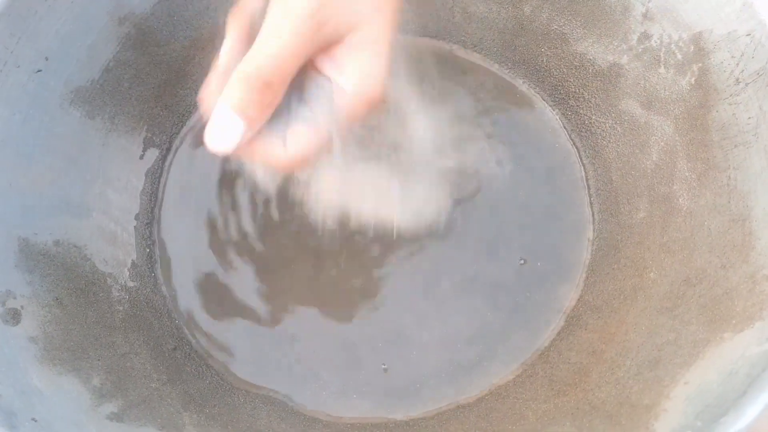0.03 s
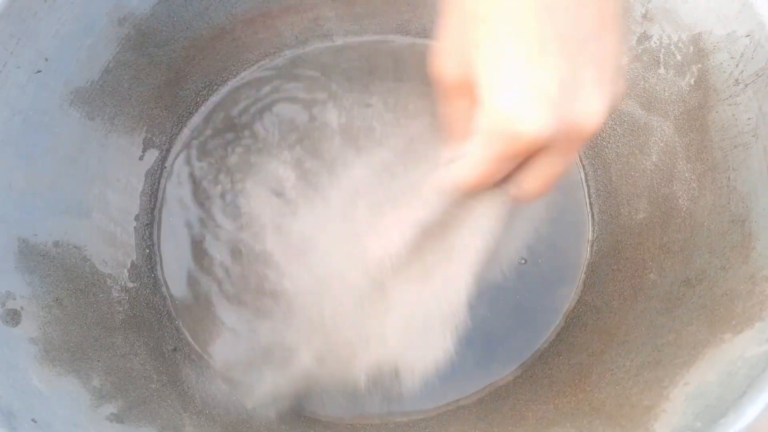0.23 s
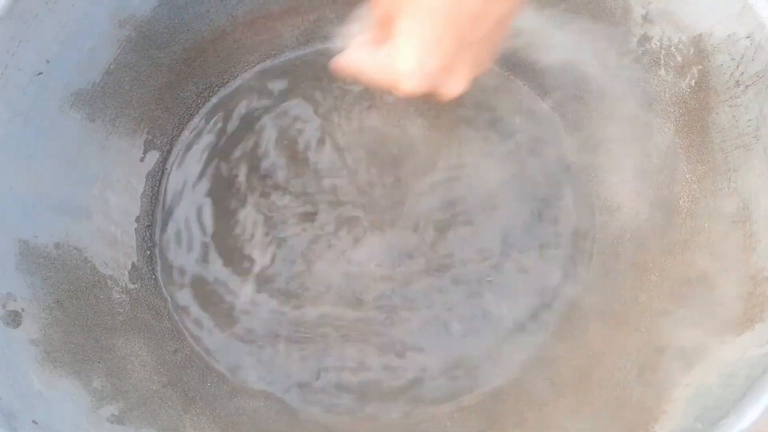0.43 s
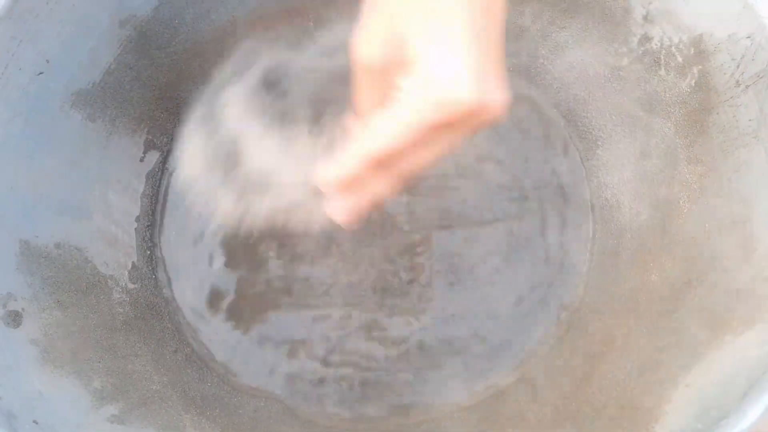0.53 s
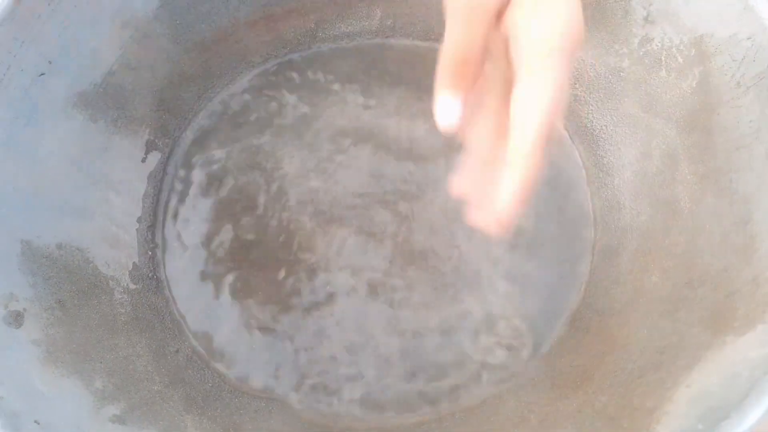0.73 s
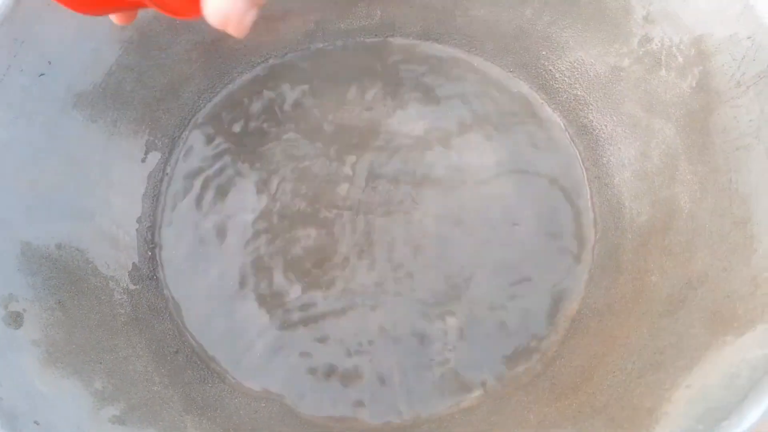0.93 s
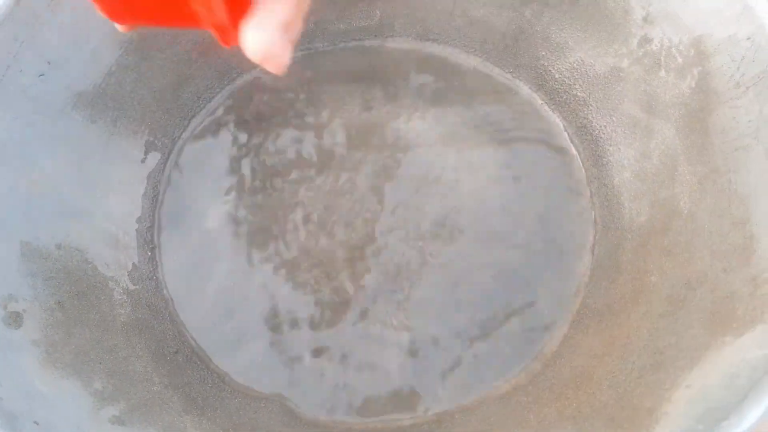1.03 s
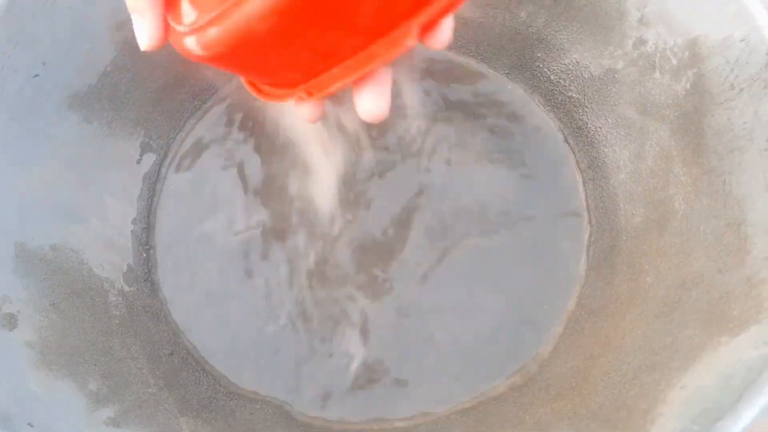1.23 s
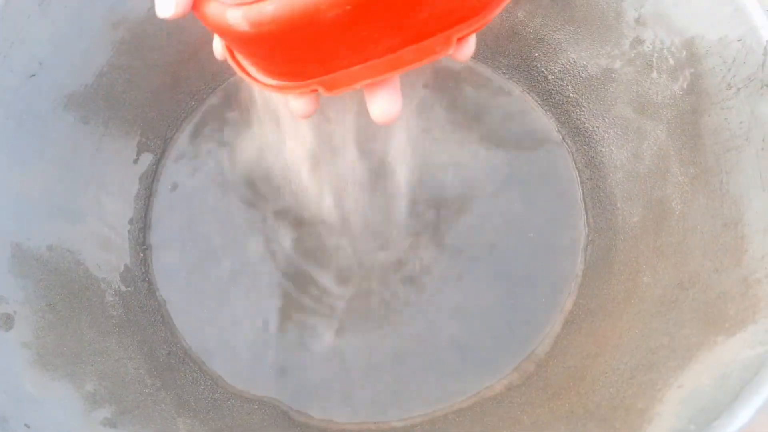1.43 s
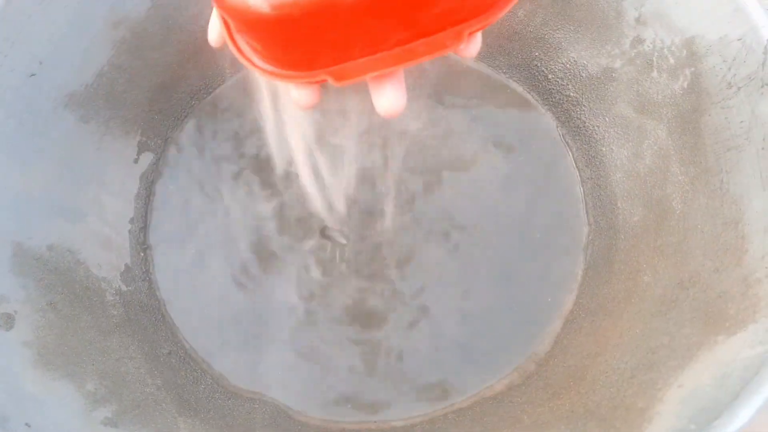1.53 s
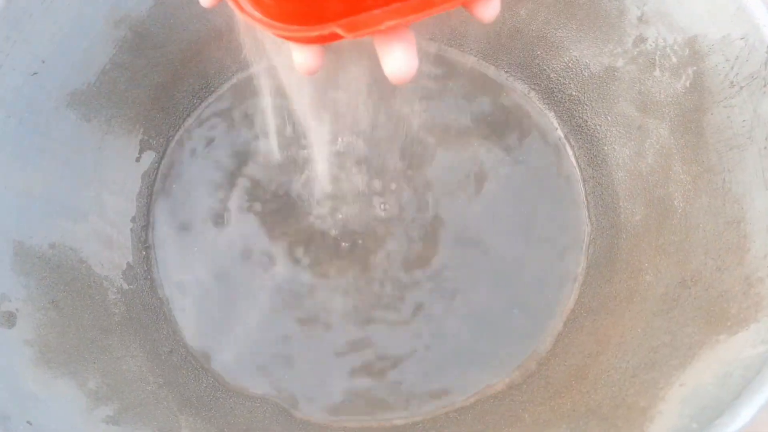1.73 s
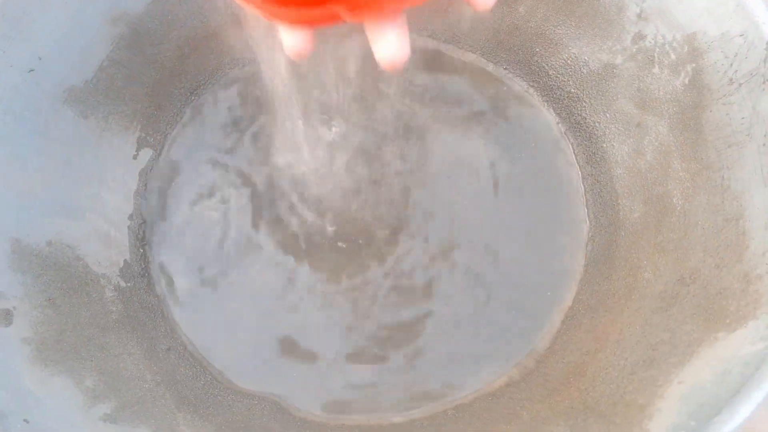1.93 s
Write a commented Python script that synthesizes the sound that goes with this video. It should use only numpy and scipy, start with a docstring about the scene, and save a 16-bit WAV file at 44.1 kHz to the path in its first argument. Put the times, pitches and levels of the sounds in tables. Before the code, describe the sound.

Sand lands in a basin of water, hissing with ticks and ringing drips for the first 0.8 seconds. From 0.2 to 0.5 seconds a loud, bassy puff of air buffets the microphone on the left. After a lull, poured sand crackles, plops and gurgles hollowly from 1.3 to 1.6 seconds, then thin streams patter until 2 seconds. A low outdoor rumble lies behind, with faint hooting early on.

```python
"""Sand is flung into a wide basin with a pool in its bottom; the throw blows air across the left
microphone port. Fine grains hiss on the water, lumps tick as they hit, and drips ring with clear notes.
After a lull, sand is poured: a dense run of cracks and bubbles that ring in the hollow, gurgling basin.
The last thin streams drum on the pool.
Behind it all lies a low outdoor rumble, with a faint hooting tone early on."""
import sys
import numpy as np
from scipy import signal
from scipy.fft import rfft, irfft, next_fast_len
from scipy.io import wavfile
from scipy.ndimage import uniform_filter1d, map_coordinates

SR = 44100
rng = np.random.default_rng(int(sys.argv[2]) if len(sys.argv) > 2 else 0)


def wav_record(signal):
    """Record a signal, one row per channel, as 16-bit PCM in the file named by sys.argv[1]."""
    frames = np.transpose(np.atleast_2d(signal))
    bounded = np.clip(frames, -1, 1)
    # unit amplitude maps onto the largest positive 16-bit level
    quanta = np.round(bounded * 32767).astype(np.int16)
    wavfile.write(sys.argv[1], SR, quanta)


N = 88200

# flow of falling sand (time [s], level [dB])
SAND_FLOW = [(0, -54), (0.025, -66.5), (0.08, -49), (0.11, -65.5), (0.21, -68), (0.245, -45.5), (0.3, -52),
             (0.4, -43), (0.465, -51.5), (0.5, -44), (0.55, -52), (0.65, -58.5), (0.7, -54), (0.8, -61),
             (0.915, -72), (0.935, -56.5), (1.02, -55.5), (1.05, -50), (1.105, -46.5), (1.125, -53),
             (1.31, -54.5), (1.38, -41), (1.46, -41.5), (1.53, -50.5), (1.66, -54.5), (1.89, -56.5),
             (1.975, -48), (2, -60)]
# tone of grains on water (frequency [Hz], gain [dB])
GRAIN_COLOUR = [(700, -8.5), (1700, -10), (3000, 2), (4500, 4), (6500, 1), (8300, 1.5), (9400, -12),
                (12500, -7.5), (16000, -5.5)]
TOP_HZ, CRACK_T60_S = 16000, .0042
NOTE_HOLD_S, TICK_HOLD_S = .02, .003  # a hit carries the energy of its level held this long
LEFT_RIGHT = np.array([[.5], [-.5]])  # splits a difference between the channels


def sand():
    """Fine grains fizz on the surface, coarser ones standing out, over the churn of stirred water."""
    # lean of the fizz (frequency [Hz], left over right [dB])
    balance = [(1000, 2), (5000, -0.5), (8500, -4), (10000, 11), (15000, 4)]
    # swell of the stirred water (time [s], level [dB])
    stirring = [(0, -57), (0.13, -62), (0.25, -47), (0.43, -48.5), (0.52, -57.5), (0.62, -68), (0.73, -63),
                (0.85, -59.5), (1.31, -54.5), (1.38, -77), (1.5, -50), (1.63, -54.5), (1.75, -60.5)]
    # tone of the stirred water (frequency [Hz], gain [dB])
    churn_colour = [(200, -49), (500, -2), (1000, 2), (1600, 7), (2300, 2.5), (3500, -6)]
    grains_per_s, spread_db = 2700, 3
    sizes = amp(spread_db * np.minimum(rng.exponential(size=N), 5))
    grains = (rng.random(N) < grains_per_s / SR) * sizes * rng.standard_normal((2, N))
    grains = causal(stereo(grains), lambda hz: amp(along(GRAIN_COLOUR, hz)))
    fizz = unit(noise(GRAIN_COLOUR) + amp(-2.5) * unit(grains))
    churn = amp(curve(stirring) - 3 + 3 * wobble(40.26)) * noise(churn_colour)
    return amp(curve(SAND_FLOW) - 1 + 2.08 * wobble(56.76)) * panned(fizz, balance) + churn


def specks(per_s=35):
    """Now and then one coarser grain ticks out of the hiss."""
    hits = (rng.random(N) < per_s / SR) * amp(3 * rng.standard_normal(N))
    t = np.arange(2 ** 8) / SR
    tick = burst(stereo(rng.standard_normal((2, len(t)))) * decay(t, CRACK_T60_S), TICK_HOLD_S)
    train = signal.fftconvolve(hits[None], tick, axes=1)[:, :N]
    return amp(curve(SAND_FLOW) - 4) * causal(train, lambda hz: amp(along(GRAIN_COLOUR, hz)))


def lumps(ring_cycles=41):
    """Each lump cracks the surface, throws spray and rings one small bubble in the basin."""
    # lumps landing (time [s], bubble level [dB], bubble pitch [Hz], crack level [dB], right lag [s])
    landings = [(0.0369, -48, 7600, -35, 0.000124), (0.071, -36.5, 5320, -45, 0.00021),
                (0.1548, -50, 6440, -32, 0.00011), (0.312, -47, 10900, -36.5, 0.00017),
                (0.329, -40, 4820, -40, 0.00023), (0.403, -37, 5000, -29.5, 0.00013),
                (0.4879, -38.5, 5340, -41, 0.00023), (0.509, -38, 3930, -50, 0.00019),
                (0.7461, -36, 4000, -33, 0.0001), (0.7583, -44, 3700, -32.5, 0.00018),
                (1.328, -33, 3540, -38, 0.00018), (1.358, -25, 3290, -34.5, .0001),
                (1.3723, -28, 7700, -26.5, 0.000098), (1.4054, -36.5, 10440, -22, .00012),
                (1.4245, -32, 8400, -24, 0.000086), (1.453, -32, 5950, -43, 0.00024),
                (1.467, -38, 11000, -29, .00016), (1.487, -35.5, 4140, -53, 0.000053),
                (1.513, -35, 3300, -37, 0.000091), (1.5489, -25, 5320, -23, 0.00014),
                (1.5552, -26, 4780, -18.5, 0.00019), (1.594, -43, 5960, -33.5, 0.00015),
                (1.726, -61, 6160, -43.5, 0.00013), (1.770, -49.5, 6500, -53, 0.00011)]
    # tone of the crack (frequency [Hz], gain [dB])
    crack_colour = [(1000, -15), (3000, -3.5), (7500, 0), (9500, -11.5), (12500, -1.5), (16000, -6)]
    out, t = np.zeros((2, N)), np.arange(2 ** 12) / SR
    spray = amp(-9) * decay(t, t60=.025)
    snap = (decay(t, CRACK_T60_S) + spray) * attack(t, .0004)
    for s, db, hz, crack_db, lag in landings:
        bubble = np.sin(2 * np.pi * hz * t) * decay(t, ring_cycles / hz) * attack(t, .000067)
        ring = signal.fftconvolve(basin()[:, :len(t)], bubble[None], axes=1)[:, :len(t)]
        crack = stereo(rng.standard_normal((2, len(t)))) * snap
        crack = causal(crack, lambda f: amp(along(crack_colour, f)))
        tone = burst(bubble, TICK_HOLD_S) + amp(-10) * burst(ring, TICK_HOLD_S)
        hit = amp(db - .5) * tone + amp(crack_db - 4.5) * burst(crack, TICK_HOLD_S)
        add(out, s, lagged(hit, lag))
    return out


def plops():
    """A cavity closes behind a lump with a short note and sets the basin ringing around that pitch."""
    # closing cavities (time [s], level [dB], pitch [Hz], ring width [octaves])
    cavities = [(0.155, -41, 2132, 0.13), (0.155, -43.5, 1360, 0.45), (0.234, -43.5, 2224, 0.29),
                (0.242, -48, 1070, 0.13), (0.309, -36, 1420, 0.17), (0.488, -42.5, 4670, 0.38),
                (0.508, -42.5, 4340, 0.33), (0.745, -49, 3880, 0.45), (0.759, -40.5, 1750, 0.3),
                (1.328, -37, 340, 0.75), (1.327, -40.5, 1710, 0.32), (1.357, -32.5, 2140, 0.57),
                (1.375, -31, 1550, 0.41), (1.406, -33, 1940, 0.2), (1.424, -24, 554, 0.56),
                (1.439, -29, 1360, 0.52), (1.449, -33.5, 603, 0.14), (1.557, -31, 1297, 0.26),
                (1.563, -30.5, 419, 0.27), (1.574, -35, 1027, 0.25)]
    out, t = np.zeros((2, N)), np.arange(2 ** 14) / SR
    for s, db, hz, width in cavities:
        ring = causal(basin(), lambda f: resonance(f, hz, width))
        note = np.sin(2 * np.pi * hz * t) * decay(t, t60=.0094) * attack(t, .00055)
        add(out, s, amp(db) * (burst(ring, NOTE_HOLD_S) + amp(-12.5) * burst(note, NOTE_HOLD_S)))
    return out


def basin():
    """The hollow basin answers one spot of the pool: air modes over a diffuse ring, quickly building."""
    # air modes (pitch [Hz], level [dB], t60 [s])
    air_modes = [(328, 4.5, 0.21), (398, -9, 0.19), (510, -4.5, 0.17), (603, 0, 0.17), (649, -7, 0.2),
                 (732, -11, 0.16), (827, -10, 0.14), (918, -12, 0.18), (1025, -9, 0.18), (1142, -13, 0.18),
                 (1308, -12, 0.13), (1437, -8.5, 0.16), (1518, -10, 0.13), (1896, -11, 0.1)]
    # length of the diffuse ring (frequency [Hz], t60 [s])
    ring_times = [(200, 0.055), (800, 0.31), (2100, 0.15), (3200, 0.15), (5500, 0.029), (14000, 0.063)]
    hz, t, spectrum = signal.stft(stereo(rng.standard_normal((2, 2 ** 14))), SR, nperseg=256)
    tail = signal.istft(spectrum * decay(t, along(ring_times, hz)[:, None]), SR, nperseg=256)[1]
    t = np.arange(tail.shape[1]) / SR
    modes = sum(amp(db + rng.normal()) * decay(t, t60) * np.sin(2 * np.pi * (f * t + rng.random()))
                for f, db, t60 in air_modes)
    return (unit(tail) + amp(1) * unit(modes)) * attack(t, .001)


def showers(count=170, ring_cycles=13, octaves=.55, scatter_db=3.5):
    """Tiny bubbles, each a few cycles long, crackle where the sand breaks the surface."""
    # bubble clouds; short ones are clumps bursting (time [s], spread [s], level [dB], middle pitch [Hz])
    clouds = [(0.41, 0.038, -45.5, 4260), (1.075, 0.022, -53, 5400), (1.381, 0.009, -33, 4400),
              (1.405, .0017, -25, 5400), (1.428, 0.0027, -32, 5100), (1.439, 0.0023, -29.5, 4400),
              (1.455, 0.011, -46.5, 4260), (1.491, 0.0036, -37, 2820)]
    out, t = np.zeros((2, N)), np.arange(2 ** 9) / SR
    for s, spread, db, middle in clouds:
        shower = np.zeros((2, N))
        for when, pitch, size, place in rng.standard_normal((count, 4)):
            hz = min(middle * 2 ** (octaves * pitch), TOP_HZ)
            bubble = np.sin(2 * np.pi * hz * t + place * LEFT_RIGHT) * decay(t, ring_cycles / hz)
            gain = amp(scatter_db * min(size, 2)) * np.sqrt(hz / middle)
            add(shower, s + spread * when, gain * bubble)
        out += amp(db) * burst(shower, 2 * spread)
    return out


def drips(split_hz=50, waver_rad=.65, wavers_per_s=180):
    """A drip traps a bubble whose clear note wavers as the water moves and beats against its echo."""
    # ringing drips (time [s], level [dB], pitch [Hz], t60 [s])
    notes = [(0.038, -46, 2920, .14), (0.155, -40.5, 2135, .18), (0.232, -51, 2230, .08),
             (0.260, -48, 3020, .11), (0.746, -46.5, 3820, .11), (0.760, -46.5, 1785, .36),
             (0.862, -60, 2190, .22)]
    out, t = np.zeros((2, N)), np.arange(N) / SR

    def partial(hz):
        phase = 2 * np.pi * (hz * t + rng.random((2, 1)))
        return np.sin(phase + waver_rad * np.array([wobble(wavers_per_s), wobble(wavers_per_s)]))

    for s, db, hz, t60 in notes:
        note = partial(hz) + amp(-5) * partial(hz - split_hz * rng.uniform(.42, 2.12))
        add(out, s, amp(db) * burst(note * decay(t, t60) * attack(t, .001), NOTE_HOLD_S))
    return out


def gurgles(octaves=.11):
    """Moving water keeps single air modes of the basin sounding."""
    # hollow swells (peak time [s], half-length [s], level [dB], pitch [Hz])
    swells = [(0.027, 0.15, -49.5, 621), (1.22, 0.061, -53.5, 667), (1.406, 0.096, -35, 337),
              (1.492, 0.05, -44, 700), (1.478, 0.15, -42, 66), (1.73, 0.17, -54.5, 478)]
    out = np.zeros((2, N))
    for s, half_length, db, hz in swells:
        hum = filtered(stereo(rng.standard_normal((2, N))), lambda f: resonance(f, hz, octaves))
        out += amp(db) * swell(s, half_length) * unit(hum)
    return out


def dribbles():
    """The last thin streams drum on the pool, each swelling and fading."""
    # streams (peak time [s], half-length [s], level [dB])
    streams = [(1.696, 0.041, -49), (1.834, 0.042, -47.5), (1.974, 0.037, -42)]
    # tone of the drumming (frequency [Hz], gain [dB])
    colour = [(500, -47), (800, -9), (930, 4), (1050, 6.5), (1300, -16), (1700, -9.5), (2300, -19),
              (5000, -20.5)]
    flow = sum(amp(db) * swell(s, half_length) for s, half_length, db in streams)
    return flow * noise(colour)


def puff():
    """Air from the throw buffets the left microphone port alone."""
    # gust on the port (time [s], level [dB])
    gust = [(0.205, -55), (0.22, -18.5), (0.25, -28), (0.265, -12.5), (0.31, -19), (0.33, -7.5),
            (0.36, -14), (0.47, -13.5), (0.485, -17.5), (0.495, -57), (0.56, -55)]
    # bassy tone of the buffeting (frequency [Hz], gain [dB])
    colour = [(25, -21), (65, -2.5), (118, 3), (170, -6), (220, -16), (310, -13.5), (400, -29), (900, -72)]
    air = signal.hilbert(noise(colour)[0])
    power = np.abs(uniform_filter1d(np.abs(air) ** 2, size=1500)) / 2
    steady = air.real / np.sqrt(power + 1e-9)  # evened out, so the gust sets the shape
    return np.array([amp(curve(gust)) * steady, np.zeros(N)])


def rumble():
    """A low outdoor rumble rises and falls."""
    # swell of the rumble (time [s], level [dB])
    levels = [(0, -45), (0.45, -46), (0.62, -57.5), (0.92, -52), (1.07, -48), (1.16, -52), (1.25, -44.5),
              (1.32, -54.5), (1.45, -41), (1.68, -48), (1.89, -55.5), (2, -47.5)]
    # its dark tone (frequency [Hz], gain [dB])
    colour = [(25, -12), (70, -8), (130, 1.5), (230, -9.5), (350, -7), (600, -17), (850, -27), (2000, -48)]
    return amp(curve(levels)) * noise(colour)


def hoots(bend=.064, waver=.017, flutter_db=2.5):
    """A faint, fluttering tone arches up and back down in pitch and level."""
    # hoots (start [s], length [s], level [dB], top pitch [Hz])
    notes = [(0.0, 0.23, -48, 368.6), (0.075, 0.082, -46, 369.5), (0.806, 0.14, -49, 403.5),
             (0.927, .19, -52, 404.6)]
    out, t = np.zeros(N), np.arange(N) / SR
    for s, length, db, hz in notes:
        arch = np.sin(np.pi * np.clip((t - s) / length, 0, 1))
        pitch = hz * (1 - bend * (1 - arch) + waver * wobble(60.6))
        tone = np.sqrt(2) * np.sin(2 * np.pi * np.cumsum(pitch) / SR)
        out += amp(db + flutter_db * wobble(47.43)) * arch * tone
    return out


def amp(db):
    """Decibels to gain."""
    return 10 ** (np.asarray(db) / 20)


def unit(x):
    """Scale x to rms 1."""
    return x / np.sqrt(np.mean(x ** 2) + 1e-20)


def burst(x, seconds):
    """Scale x to the energy of rms 1 held for that long."""
    return x * np.sqrt(seconds * SR / (np.mean(np.sum(x ** 2, axis=-1)) + 1e-20))


def attack(t, seconds):
    """Rise to 1 with this time constant."""
    return 1 - np.exp(-t / seconds)


def decay(t, t60):
    """Fall by 60 dB every t60 seconds."""
    return amp(-60 * t / t60)


def swell(peak_s, half_length):
    """A bell-shaped fade in and out."""
    return np.exp(-2 * ((np.arange(N) / SR - peak_s) / half_length) ** 2)


def along(points, hz):
    """Read (frequency, value) points on a log axis."""
    f, v = np.transpose(points)
    return np.interp(np.log(hz + 1), np.log(f + 1), v)


def curve(rows):
    """Join (time, value) points, one value per sample."""
    return np.interp(np.arange(N) / SR, *np.transpose(rows))


def wobble(rate):
    """A smooth random curve, rate knots a second."""
    return map_coordinates(rng.standard_normal(int(N * rate / SR) + 4), [np.arange(N) * rate / SR])


def resonance(hz, centre, octaves):
    """Gain of a resonant peak."""
    return (1 + (np.log2((hz + 1) / centre) / octaves) ** 2 / 2) ** -1.5


def filtered(x, response):
    """Pass x through a complex frequency response."""
    n = x.shape[-1]
    m = next_fast_len(n + 8192)
    return irfft(rfft(x, m) * response(np.fft.rfftfreq(m, 1 / SR)), m)[..., :n]


def causal(x, gain, size=8192):
    """Colour x with no sound ahead of its attack (minimum phase)."""
    cepstrum = irfft(np.log(np.maximum(gain(np.fft.rfftfreq(size, 1 / SR)), 1e-4)))
    cepstrum[1:size // 2] *= 2
    cepstrum[size // 2 + 1:] = 0
    impulse = irfft(np.exp(rfft(cepstrum)))
    return signal.fftconvolve(x, impulse[None], axes=1)[:, :x.shape[1]]


def stereo(pair):
    """Make two unrelated signals partly alike."""
    # narrowness of the image (frequency [Hz], left-right likeness [0-1])
    likeness = [(100, 1), (500, 0.57), (1000, 0.62), (2000, 0.094), (12000, 0.45)]
    turn = lambda hz: np.arccos(np.clip(along(likeness, hz), -1, 1)) / 2
    mid, side = filtered(pair, lambda hz: np.array([np.cos(turn(hz)), np.sin(turn(hz))]))
    return np.array([mid + side, mid - side])


def noise(colour):
    """Coloured stereo noise of rms 1."""
    return unit(filtered(stereo(rng.standard_normal((2, N))), lambda hz: amp(along(colour, hz))))


def panned(x, balance):
    """Lean each frequency left or right."""
    return filtered(x, lambda hz: amp(along(balance, hz) * LEFT_RIGHT))


def lagged(x, seconds):
    """Let the right channel trail the left."""
    return filtered(x, lambda hz: np.exp(2j * np.pi * hz * seconds * LEFT_RIGHT))


def add(out, s, x):
    """Mix x into out at time s."""
    i = max(round(s * SR), 0)
    out[:, i:i + x.shape[1]] += x[:, :N - i]


def scene():
    """Splashes and falling sand up front, the puff on the left, the outdoors behind."""
    # lean of the splashes (frequency [Hz], left over right [dB])
    balance = [(200, -1), (600, 2.5), (1500, 2), (4000, 0), (8000, -4), (13000, 1.5)]
    port_lag_s = .00016  # the right port hears the pool later
    splashes = lumps() + drips() + lagged(plops() + showers(), port_lag_s)
    pouring = lagged(sand() + specks() + dribbles() + gurgles(), port_lag_s)
    return panned(splashes, balance) + pouring + puff() + rumble() + hoots()


def record(dry):
    """A steep low-pass cuts the very top."""
    return filtered(dry, lambda hz: 1 / (1 + (hz / TOP_HZ) ** 160))


dry = scene()
out = record(dry)
wav_record(out)
```